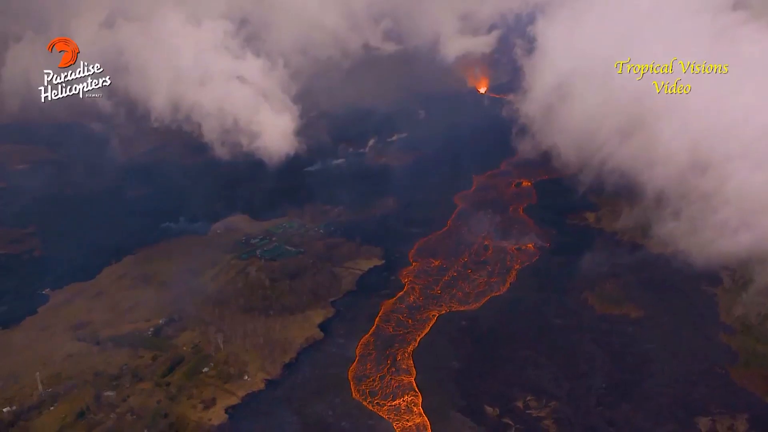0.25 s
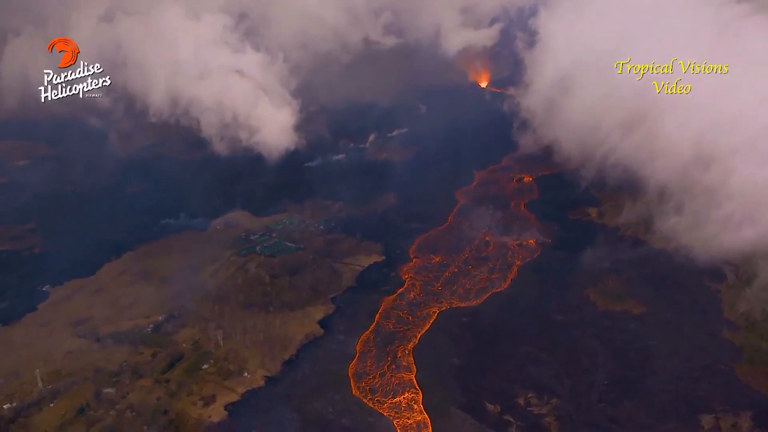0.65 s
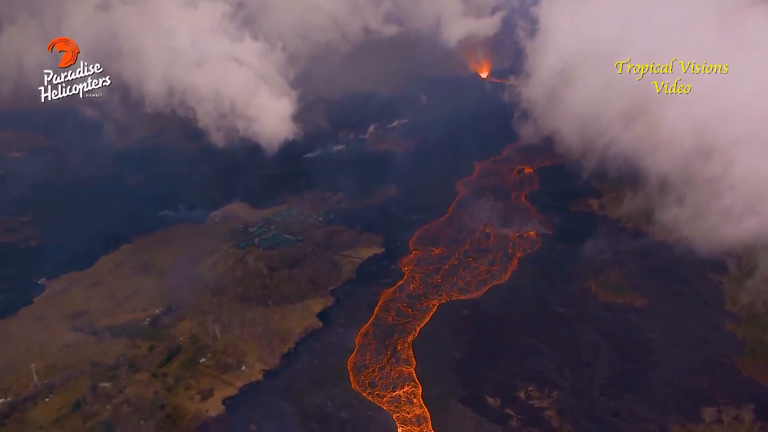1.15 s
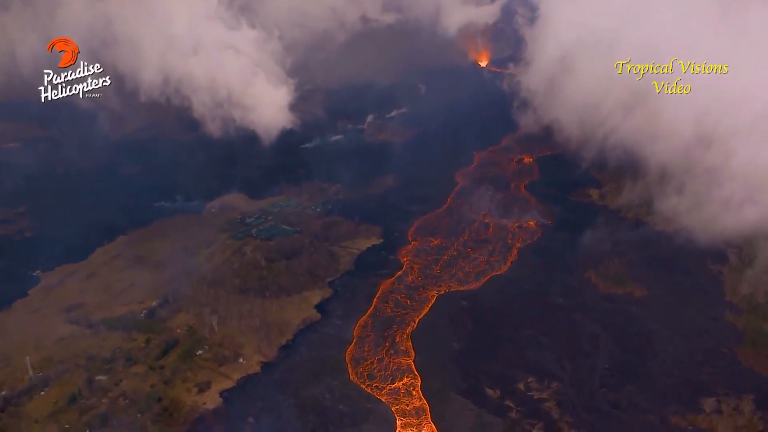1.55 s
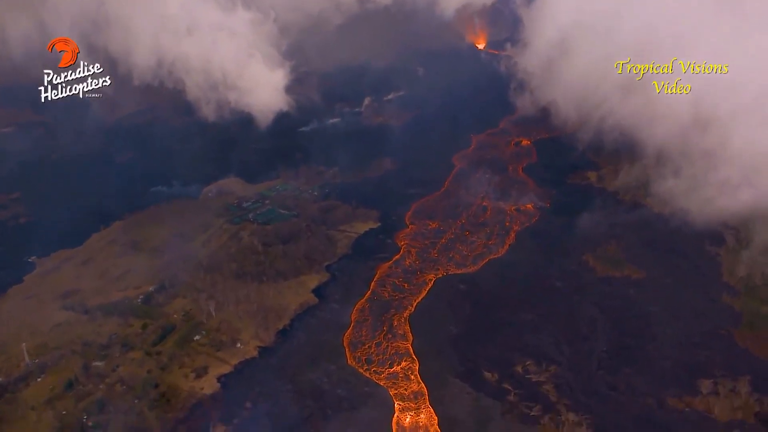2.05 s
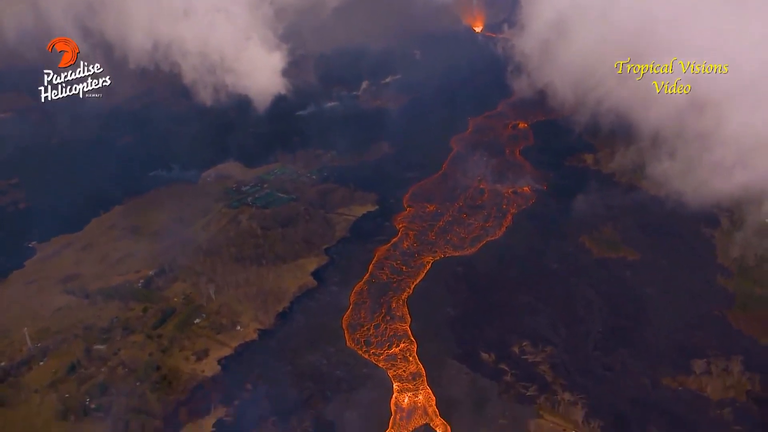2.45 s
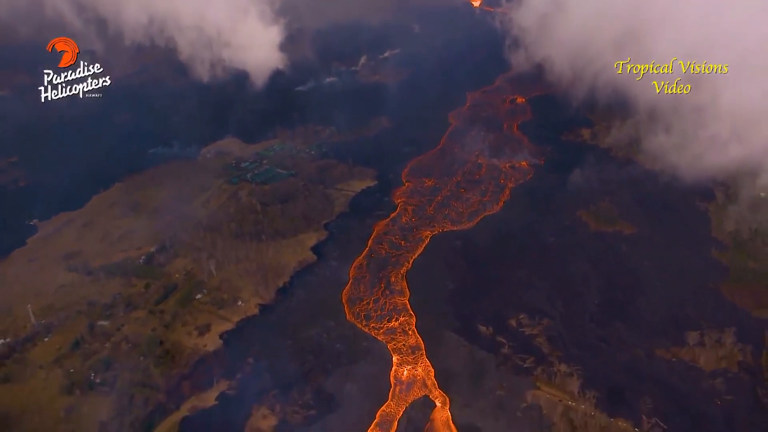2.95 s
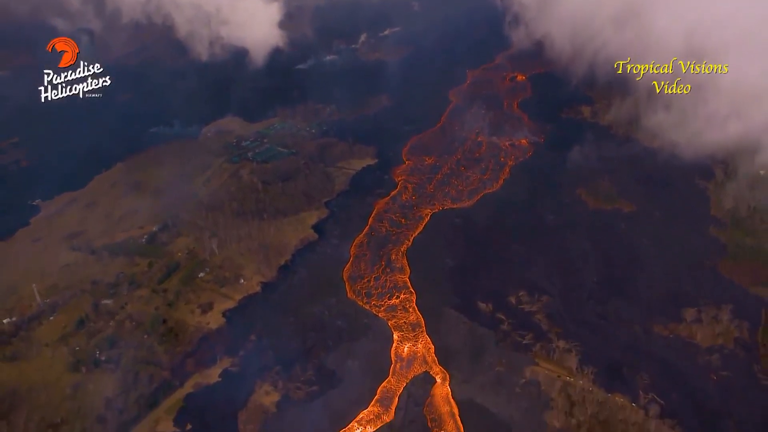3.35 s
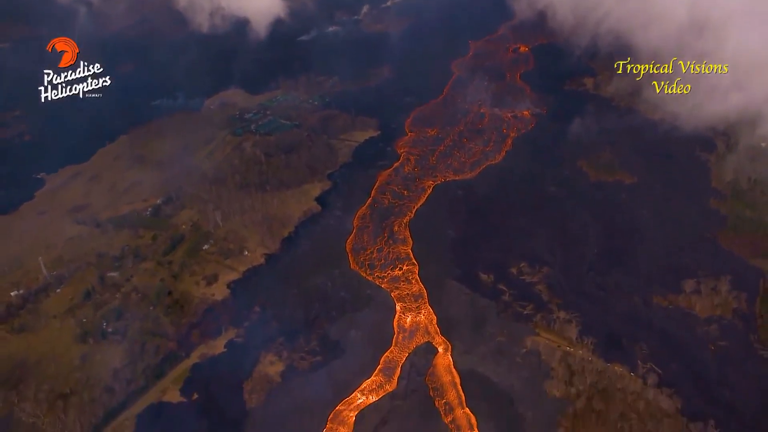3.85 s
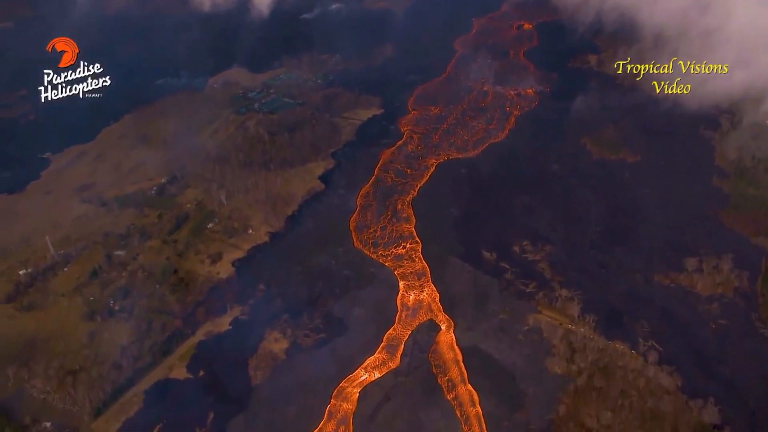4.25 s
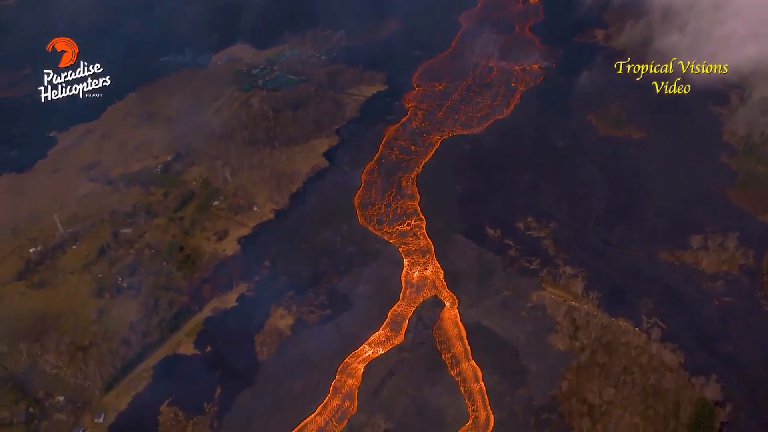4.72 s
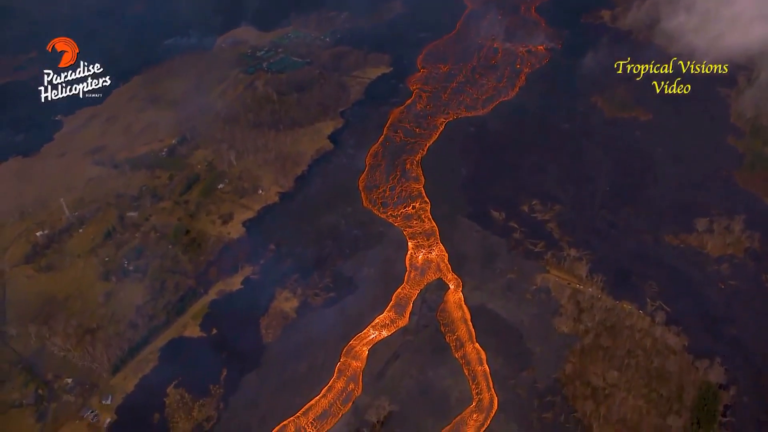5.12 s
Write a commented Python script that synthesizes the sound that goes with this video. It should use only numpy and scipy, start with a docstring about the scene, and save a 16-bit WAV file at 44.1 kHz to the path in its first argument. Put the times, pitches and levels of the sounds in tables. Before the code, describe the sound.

A steady helicopter drone with many humming and whining tones swells in through cabin noise, close and mono. Around two seconds the slipstream reaches the microphone: fluttering bursts, then hard slaps and duller gusts. By three and a half seconds the wind dominates, crackling and rumbling, with only the rush and a few thin piercing tones left behind it.

```python
"""Inside a helicopter in flight, a mono microphone in the cabin, fading in from silence over a second.
First the machinery: rotors, drive shaft, turbine and gears sing as harmonics and tones on one shared
clock, through the filtered noise of the cabin rush. From about two seconds on the slipstream strikes
the microphone: noise bursts of a few milliseconds, then slaps, duller gusts and rumble. As it builds,
the hum and whine are turned down under it, and gain control and a limiter hold the overall level."""
import sys
import numpy as np
from scipy import signal
from scipy.fft import rfft, irfft
from scipy.io import wavfile
from scipy.ndimage import uniform_filter1d, minimum_filter1d

SR = 44100
rng = np.random.default_rng(int(sys.argv[2]) if len(sys.argv) > 2 else 0)


def put_to_file(sound):
    """Save the sound as 16-bit audio at rate SR, in the file named by the first command-line argument."""
    columns = np.atleast_2d(sound).T  # one column per channel
    safe = np.clip(columns, -1, 1)
    whole_steps = np.round(safe * 32767)
    wavfile.write(sys.argv[1], SR, whole_steps.astype(np.int16))


N = 237516
TIME = np.arange(N) / SR  # seconds
BINS = np.fft.rfftfreq(N, 1 / SR)  # Hz

# All levels are relative: the mix and the gain control trim them further.
# Nominal base rates of the geared parts, Hz
MAIN_HZ, TAIL_HZ, SHAFT_HZ, TURBINE_HZ = 40.63, 96.9, 35.38, 102.41
# Governed speed of the turbine, sagging slightly at about two seconds: time_s, rate_hz
TURBINE_SPEED = [(0.2, 102.34), (0.8, 102.42), (2.0, 102.4), (2.4, 102.29), (3.2, 102.33), (4.0, 102.28)]
# Harmonics of the main rotor: order (multiple of its rate), level_db
MAIN_ROTOR = [(6, -47), (11, -46), (12, -47), (13, -46), (14, -43), (15, -46), (17, -52), (18, -50),
              (19, -45), (20, -52), (24, -46), (27, -49)]
# Harmonics of the tail rotor: order, level_db
TAIL_ROTOR = [(1, -61), (2, -40.5), (3, -40.5), (4, -51), (5, -51.5), (6, -49.5), (8, -53)]
# Harmonics of the drive shaft: order, level_db
DRIVE_SHAFT = [(7, -48), (11, -45), (12, -42), (14, -49), (15, -44), (17, -36.7), (20, -49), (21, -48),
               (22, -49), (23, -47), (24, -48), (25, -47), (29, -48), (31, -49), (37, -48), (39, -46),
               (40, -50)]
# Harmonics of the turbine: order, level_db
TURBINE = [(10, -48), (14, -56), (15, -49), (24, -37), (32, -51), (33, -57), (34, -55), (36, -61),
           (38, -50), (44, -60), (50, -59), (52, -64), (53, -62)]
# The shaft harmonic just under the strongest one swells and ebbs slowly, close to a main-rotor
# harmonic: time_s, level_db
PARTNER_ORDER = 16
PARTNER_LEVEL = [(0.25, -38), (0.55, -40), (1.0, -33.5), (1.2, -35.5), (1.3, -40), (1.45, -36), (1.75, -40),
                 (2.05, -35), (2.22, -37), (2.4, -32), (2.9, -34)]
# A low harmonic of the main rotor drones in slow swells: time_s, level_db
DRONE_ORDER = 7
DRONE_LEVEL = [(0.4, -45), (1.1, -36.5), (1.4, -54), (1.72, -33), (1.93, -46), (2.13, -34), (2.3, -53),
               (2.58, -38), (2.75, -45)]
# The turbine's low hum: time_s, level_db
TURBINE_HUM_LEVEL = [(0.5, -37), (1.7, -35.3), (2.7, -34.5), (3.3, -35)]
# Tones of the accessory gears: pitch_hz, level_db
GEARS = [(806.1, -43), (1126.5, -50), (1946.1, -46), (2318.9, -56)]
# Main gear mesh and top of the compressor, cutting through the wind: pitch_hz, level_db
PIERCING = [(1202.6, -43), (5837.4, -58), (6554.2, -54)]
# Turbine and gear whine, which dips at moments and fades down under the wind: time_s, gain_db
WHINE_LEVEL = [(0.2, -2.5), (0.65, -1), (1.3, 0), (2.0, -0.5), (2.27, -6), (2.42, 1), (2.72, 0),
               (2.85, -2.5), (3.2, -1), (3.37, -6), (3.52, -2.5), (3.7, -7), (4.2, -10)]
WHINE_FLUTTER_DB = 1.5  # rms of the quick flutter of the turbine's harmonics
# The hum sinks as the airflow grows: it loses HUM_SLOPE dB for each dB above MASK_FROM_DB
HUM_DB, MASK_FROM_DB, HUM_SLOPE = -2.9, -28, 0.78

# The slipstream builds as the microphone moves into the airflow, then holds: time_s, level_db
AIRFLOW = [(0.8, -45), (1.6, -45), (2.1, -33), (2.45, -35.5), (2.65, -26), (3.15, -24.5), (3.4, -22),
           (3.7, -22), (3.8, -23.5), (3.93, -21), (4.0, -21), (4.07, -21.5), (4.3, -22.5), (4.7, -22),
           (5.15, -21.5), (5.39, -25)]
GUST_DB, GUST_HZ = 0.7, 10  # random surges: rms in dB, fastest rate in Hz
# Spectrum of the slipstream on the microphone: pitch_hz, density_db (per Hz)
WIND = [(25, -35), (60, -23), (120, -6.5), (200, 2), (400, 4.5), (650, 3), (1200, -1.5), (2000, -10),
        (3000, -17), (4500, -33.5), (8000, -84.5)]
# The hardest single buffets of air: peak_s, level_db, length_s
BUFFETS = [(2.417, -23, 0.004), (2.725, -22, 0.005), (2.874, -20, 0.005), (2.913, -21, 0.008),
           (3.033, -19, 0.007), (3.152, -17, 0.007), (3.267, -18, 0.004), (3.331, -19, 0.006),
           (3.365, -19, 0.005), (3.434, -17, 0.005), (3.453, -14, 0.004), (3.474, -17, 0.014),
           (3.536, -19, 0.005), (3.575, -17, 0.006), (3.661, -18, 0.006), (3.742, -18, 0.004),
           (3.816, -17.5, 0.009), (3.844, -17, 0.004), (3.854, -17, 0.006), (3.984, -17, 0.004),
           (4.032, -16, 0.006), (4.159, -17, 0.003), (4.18, -18, 0.005), (4.197, -17, 0.004),
           (4.237, -14, 0.003), (4.27, -17, 0.004), (4.362, -14, 0.003), (4.459, -18, 0.007),
           (4.608, -17, 0.005), (4.757, -17, 0.005), (5.101, -18, 0.005), (5.32, -14, 0.004),
           (5.368, -20, 0.007)]
# Longer, duller gusts: peak_s, level_db, length_s
GUSTS = [(2.46, -29, 0.19), (3.41, -17.5, 0.04), (3.65, -26, 0.077), (4.06, -17.5, 0.067), (4.7, -27, 0.14)]
# Spectrum of the smooth low rumble of the same wind: pitch_hz, density_db (per Hz)
RUMBLE = [(30, -36), (65, -12.5), (130, -0.5), (200, -1.5), (400, -18), (1500, -63)]
# Growth of that rumble: time_s, level_db
RUMBLE_LEVEL = [(1.2, -51), (1.9, -45), (2.6, -37.5), (3.15, -36.5), (4.0, -35), (5.39, -35.5)]

# Spectrum of the steady rush in the cabin: pitch_hz, density_db (per Hz)
CABIN = [(25, -46.5), (70, -25.5), (120, -3), (170, -11.5), (250, -10.5), (370, 4), (620, -3), (1300, -1.5),
         (2000, -6), (3000, -7.5), (4900, -17), (7400, -17.5), (8700, -28), (9400, -39), (10300, -51)]
# Narrow bands of gearbox and compressor hiss: pitch_hz, width_hz, level_db
HISS_BANDS = [(2462, 100, -40), (6780, 650, -46)]
# Cabin rush and compressor hiss, wavering once the wind is up: time_s, gain_db
HISS_LEVEL = [(1.6, -0.5), (2.2, 0.7), (3.3, -0.5), (3.43, -1), (3.55, 0), (3.68, -1), (3.8, -0.5),
              (3.92, -2.2), (4.0, 3.5), (4.08, -1.8), (4.25, -1.5), (4.6, -1), (5.15, -0.5)]

CEILING_DB, EDGE_HZ = -15.0, 10200  # limiter ceiling; upper edge of the band
FADE_START_S, FADE_LENGTH_S, FADE_CURVE = 0.093, 1, 0.87


def amp(db):
    """Decibels to gain."""
    return 10 ** (np.asarray(db) / 20)


def unit(x):
    """Scales to rms 1."""
    return x / np.sqrt(np.mean(x ** 2) + 1e-20)


def curve(rows):
    """Joins (time_s, value) rows by straight lines."""
    return np.interp(TIME, *np.transpose(rows))


def swells(rows):
    """Sum of bell-shaped envelopes from (peak_s, level_db, length_s) rows."""
    return sum(amp(db) * np.exp(-(2 * (TIME - peak_s) / length_s) ** 2) for peak_s, db, length_s in rows)


def colour(x, spectrum):
    """Gives x a (pitch_hz, density_db) spectrum, joined on a log frequency axis, at rms 1."""
    hz, db = np.transpose(spectrum)
    gain = amp(np.interp(np.log(BINS + 1), np.log(hz), db))
    return unit(irfft(rfft(x) * gain, N))


def drift(rate_hz):
    """Random wandering of rms 1: noise rolled off steeply above the given rate."""
    roll_off = np.sqrt(1 + (BINS / rate_hz) ** 6)
    return unit(irfft(rfft(rng.standard_normal(N)) / roll_off, N))


def tone(hz, db, clock, waver):
    """One partial on the shared clock; moving air makes its level and phase waver."""
    sway = 1 + waver * (drift(rate_hz=5.0) + 1j * drift(rate_hz=4.7))
    return amp(db) * unit((sway * np.exp(2j * np.pi * hz * clock)).real)


def rotating(rate_hz, orders, clock, level_db, waver):
    """The harmonics of one turning part, phases scattered by the cabin, swaying together."""
    stack = 0
    for order, db in orders:
        cycles = order * rate_hz * clock + rng.random()
        stack = stack + amp(db) * np.exp(2j * np.pi * cycles)
    sway = 1 + waver * (drift(rate_hz=4.5) + 1j * drift(rate_hz=4.1))
    rms_gain = np.sqrt(2 / (1 + 2 * waver ** 2))  # keeps each level an rms level despite the sway
    return amp(level_db) * rms_gain * (stack * sway).real


def drivetrain():
    """Parts geared together share one governed speed; gives low hum, whine and piercing tones."""
    clock = np.cumsum(curve(TURBINE_SPEED) / TURBINE_HZ) / SR  # seconds at nominal speed
    rotors = rotating(MAIN_HZ, MAIN_ROTOR, clock, level_db=0.0, waver=0.2)
    rotors += rotating(TAIL_HZ, TAIL_ROTOR, clock, level_db=-2.2, waver=0.15)
    rotors += tone(DRONE_ORDER * MAIN_HZ, 0, clock, waver=0.35) * amp(curve(DRONE_LEVEL))
    shaft = rotating(SHAFT_HZ, DRIVE_SHAFT, clock, level_db=2.0, waver=0.085)
    shaft += tone(PARTNER_ORDER * SHAFT_HZ, 0, clock, waver=0.1) * amp(curve(PARTNER_LEVEL))
    turbine_hum = tone(2 * TURBINE_HZ, 0, clock, waver=0.1) * amp(curve(TURBINE_HUM_LEVEL))
    turbine = rotating(TURBINE_HZ, TURBINE, clock, level_db=-0.5, waver=0.063)
    turbine *= amp(WHINE_FLUTTER_DB * drift(rate_hz=34))
    gears = sum(tone(hz, db, clock, waver=0.084) for hz, db in GEARS)
    piercing = sum(tone(hz, db, clock, waver=0.12) for hz, db in PIERCING)
    return rotors + shaft + turbine_hum, turbine + gears, piercing


def slipstream(level_db, eddy_db, eddy_hz, lump_db, chop, crest, sharpness):
    """Eddies strike the microphone in bursts of a few milliseconds, bunched by the rotor wash."""
    eddy = eddy_db * np.clip(drift(eddy_hz), -2.5, 1.7) + lump_db * drift(rate_hz=82)  # dB
    wash = 1 + chop * np.cos(2 * np.pi * MAIN_HZ * TIME)
    low_pass = signal.butter(2, 600, fs=SR, output="sos")
    high_pass = signal.butter(2, 600, "high", fs=SR, output="sos")
    slow = signal.sosfilt(low_pass, rng.standard_normal(N) * wash)
    fast = signal.sosfilt(high_pass, rng.standard_normal(N) * wash)
    # hard eddies are brighter than soft ones
    pressure = colour(slow * unit(amp(eddy)) + fast * unit(amp(sharpness * eddy)), WIND)
    strength_db = curve(AIRFLOW) + GUST_DB * drift(GUST_HZ)
    # the strongest peaks flatten at the microphone
    return amp(level_db + strength_db) * unit(np.tanh(pressure / crest))


def buffets(level_db, low_hz, bright_hz, brightness, crest):
    """Short, hard slaps of the same wind, with less bass and more bite; their peaks flatten."""
    bass_cut = signal.butter(2, low_hz, "high", fs=SR, output="sos")
    air = signal.sosfilt(bass_cut, colour(rng.standard_normal(N), WIND))
    edge = signal.sosfiltfilt(signal.butter(1, bright_hz, "high", fs=SR, output="sos"), air)
    slap = unit(np.tanh(unit(air + brightness * edge) / crest))
    return amp(level_db) * swells(BUFFETS) * slap


def gusts(level_db, low_hz, dull_hz):
    """Lumps of slower air that swell the low middle of the wind."""
    band = signal.butter(2, [low_hz, dull_hz], "band", fs=SR, output="sos")
    air = unit(signal.sosfilt(band, colour(rng.standard_normal(N), WIND)))
    return amp(level_db) * swells(GUSTS) * air


def rumble():
    """Large, slow eddies: a continuous rumble under the buffeting."""
    return amp(curve(RUMBLE_LEVEL)) * colour(rng.standard_normal(N), RUMBLE)


def cabin(level_db, chop, tail_chop, flutter_db):
    """Airflow around the hull, pulsing a little as each main and tail blade passes."""
    blade = 2 * np.pi * MAIN_HZ * TIME
    tail_blade = 2 * np.pi * TAIL_HZ * TIME
    pulsing = 1 + chop * (np.cos(blade) + np.cos(2 * blade)) + tail_chop * np.cos(tail_blade)
    flutter = amp(level_db + flutter_db * drift(rate_hz=260))
    return flutter * pulsing * colour(rng.standard_normal(N), CABIN)


def hiss_bands():
    """Noise ringing in narrow resonances, one band each for gearbox and compressor."""
    bands = []
    for hz, width_hz, db in HISS_BANDS:
        resonance = 1 / (1 + ((BINS - hz) / (0.5 * width_hz)) ** 2)
        bands.append(amp(db) * unit(irfft(rfft(rng.standard_normal(N)) * resonance, N)))
    return bands


def scene():
    """The wind grows over the machinery and the cabin rush, all summed at one microphone."""
    hum, whine, piercing = drivetrain()
    gear_hiss, compressor_hiss = hiss_bands()
    masked_db = HUM_SLOPE * np.maximum(curve(AIRFLOW) - MASK_FROM_DB, 0)
    machinery = hum * amp(HUM_DB - masked_db)
    machinery += (whine + gear_hiss) * amp(curve(WHINE_LEVEL))
    wind = slipstream(level_db=1.5, eddy_db=3.5, eddy_hz=174, lump_db=0.53,
                      chop=0.2, crest=13.0, sharpness=1.63)
    wind += buffets(level_db=-0.5, low_hz=416, bright_hz=1800, brightness=3.7, crest=3.7)
    wind += gusts(level_db=-3.0, low_hz=262, dull_hz=700) + rumble()
    rush = compressor_hiss + cabin(level_db=-27.5, chop=0.05, tail_chop=0.028, flutter_db=1.64)
    return (machinery + piercing + rush * amp(curve(HISS_LEVEL)) + wind)[None]


def leveller(x, threshold_db, response_s, size):
    """Turns the running level down towards the threshold; averaging decibels, it hardly heeds brief slaps."""
    keep = np.exp(-1 / (response_s * SR))
    power = abs(uniform_filter1d((x ** 2).mean(0), size))
    over_db = 10 * np.log10(power + 1e-12) - threshold_db
    average_db = signal.lfilter([1 - keep], [1, -keep], over_db)
    return x / amp(np.maximum(average_db, 0))


def limiter(x, ceiling_db, recovery_db_per_s, size):
    """Turns down just ahead of every peak above the ceiling, then recovers."""
    over_db = np.maximum(20 * np.log10(abs(x).max(0) + 1e-9) - ceiling_db, 0)
    recovery = TIME * recovery_db_per_s
    held_db = np.maximum.accumulate(over_db + recovery) - recovery
    ahead_db = -minimum_filter1d(-held_db, size)  # running maximum
    return x / amp(uniform_filter1d(ahead_db, size))


def fade_in():
    """Gain that rises from silence along a quarter sine, bent by a power."""
    progress = np.clip((TIME - FADE_START_S) / FADE_LENGTH_S, 0, 1)
    return np.sin(np.pi / 2 * progress) ** FADE_CURVE


def record(dry):
    """Gain control, quick peak limiter, fade-in and band limit; sizes are in samples."""
    levelled = leveller(dry, threshold_db=-24.4, response_s=0.035, size=256)
    limited = limiter(levelled, ceiling_db=CEILING_DB, recovery_db_per_s=1500, size=24)
    low_pass = signal.firwin(401, EDGE_HZ, window=("kaiser", 9), fs=SR)
    return signal.oaconvolve(limited * fade_in(), low_pass[None], "same")


dry = scene()
out = record(dry)
put_to_file(out)
```